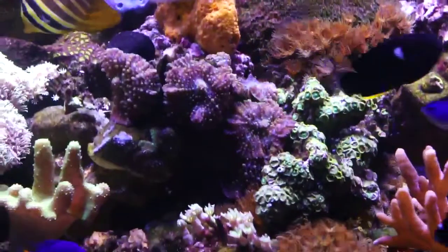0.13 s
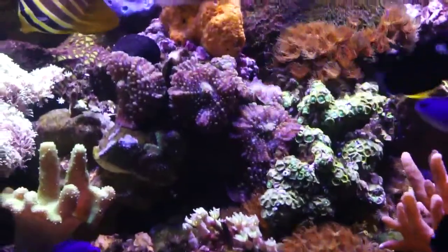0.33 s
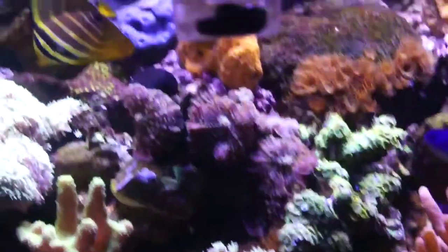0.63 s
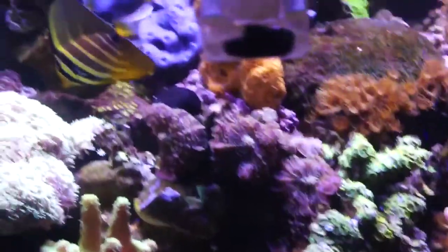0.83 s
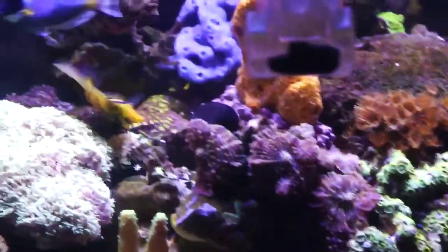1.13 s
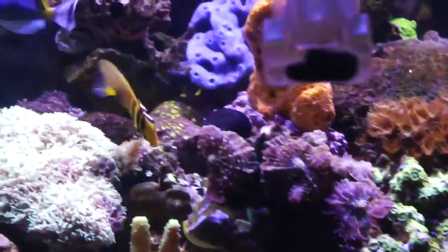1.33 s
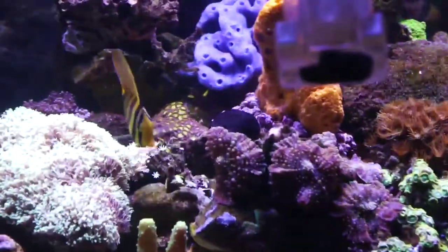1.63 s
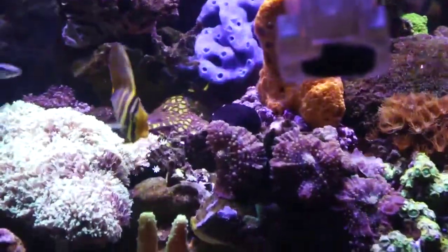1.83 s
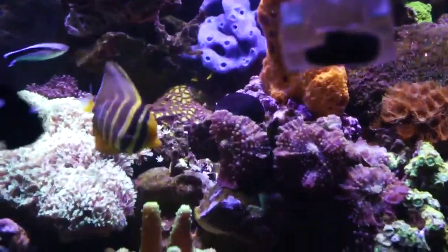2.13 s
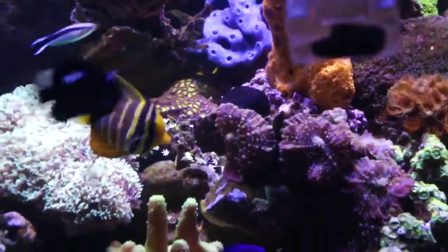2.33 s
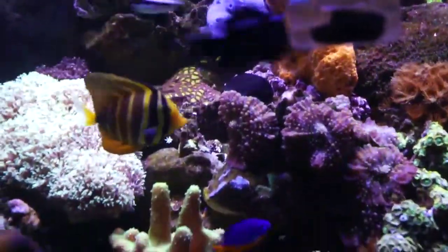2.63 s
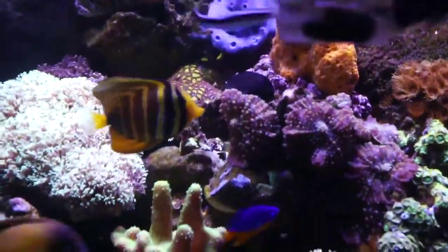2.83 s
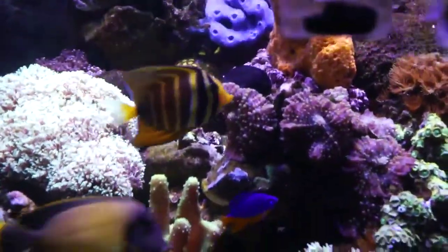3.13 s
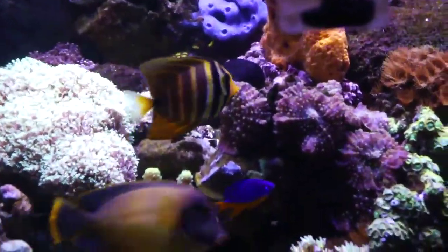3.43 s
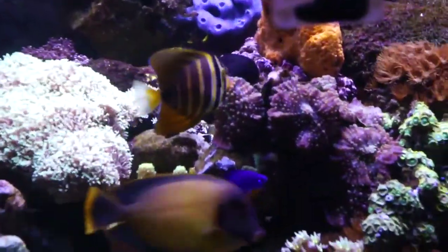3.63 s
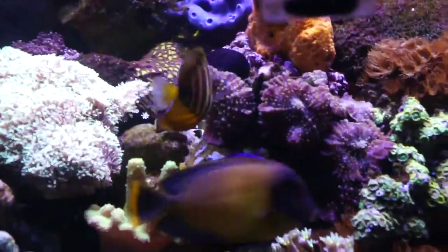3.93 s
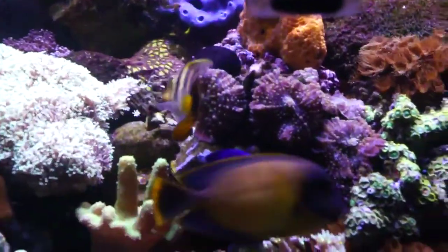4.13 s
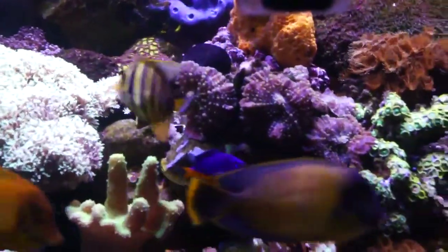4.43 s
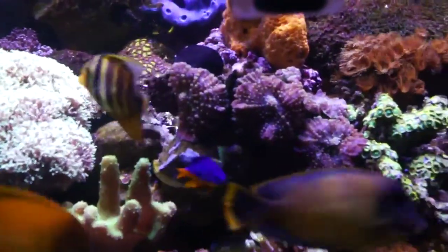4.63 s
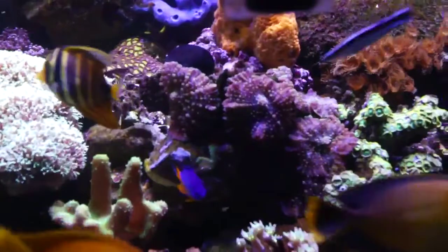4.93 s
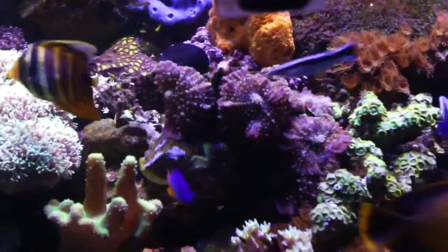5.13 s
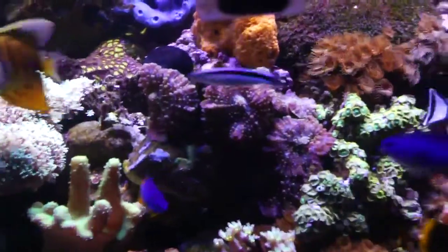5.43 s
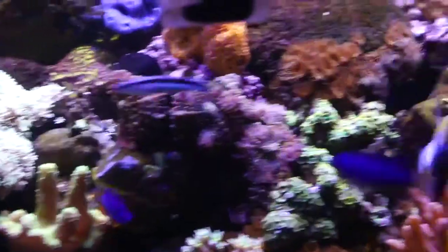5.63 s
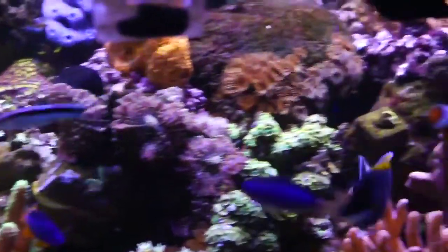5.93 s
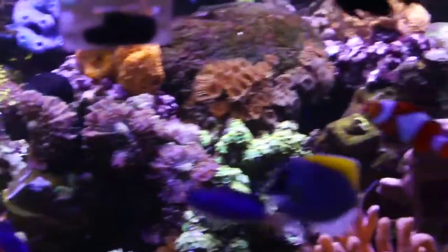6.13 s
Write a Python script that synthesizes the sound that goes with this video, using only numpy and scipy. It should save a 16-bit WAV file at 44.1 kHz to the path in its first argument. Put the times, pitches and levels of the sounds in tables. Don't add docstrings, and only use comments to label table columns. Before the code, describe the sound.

Aquarium pumps hum and water washes steadily in a small room, with faint knocks early on and one sharp plastic snap at four seconds.

```python
import sys
import numpy as np
from scipy import signal
from scipy.fft import rfft, irfft
from scipy.io import wavfile
from scipy.ndimage import uniform_filter1d

SR = 44100
rng = np.random.default_rng(int(sys.argv[2]) if len(sys.argv) > 2 else 0)


def amp(db):
    return 10 ** (np.asarray(db, float) / 20)


def write(x):
    x = np.atleast_2d(x).T
    wavfile.write(sys.argv[1], SR, np.round(np.clip(x, -1, 1) * 32767).astype(np.int16))


N = 277830
T = np.arange(N) / SR

MAINS_HZ = 49.9645
HUM_SPREAD = .39
# (multiple of mains [1], rms level [dB], left minus right [dB], left lead [rad])
HUM = [(1, -70.8, -0.6, 0.1), (2, -63.5, 0.8, 0.0), (3, -65.9, -1.6, -0.1), (4, -51.5, -3.1, 0.0),
       (6, -37.9, -2.1, -0.0), (7, -56.5, -4.1, -0.2), (8, -56.5, -0.3, -0.2), (10, -62.2, -8.5, 1.9),
       (11, -66.5, 5.2, 0.2), (13, -67.1, -1.2, 3.0), (14, -63.2, 2.2, -1.2), (15, -64.8, -7.0, 2.1),
       (17, -62.2, -7.8, -0.7), (18, -62.8, -3.6, -0.1)]
FAINT_MULTIPLES = [5, 16, 20, 22, 26, 30, 33, 46, 53, 54]
FAINT_DB, FAINT_DB_PER_OCTAVE, FAINT_PAN_DB, FAINT_PAN_SPREAD_DB = -69, -1.5, -4, 5
FAN_HZ, FAN_DB = 332, -61
# (frequency [Hz], density [dB per Hz], left minus right [dB], likeness of the ports [0-1])
WASH = [(30, -27, -14, .8), (70, -17.5, 4, 0.1), (122, -10.5, 4.5, 0), (217, -5.5, 5, 0.15),
        (368, 2, -2, 0.63), (448, -4, -2.5, 0.37), (925, -5.5, -1, 0.49), (1310, -7, -3, 0.28),
        (1930, -10, -0.5, 0.09), (2420, -9, -0.5, 0.16), (2930, -10.5, -2, 0), (3100, -13.5, 1, 0),
        (8700, -20, .5, 0.06), (12100, -28, -0.5, 0)]
WASH_DB = -44
# (frequency [Hz], width [Hz], rms level [dB], left minus right [dB])
WHIRR = [(275, 2.6, -62.5, -1), (374, 15, -60.5, -4), (493.7, 8.4, -63, 8), (660, 6.8, -72, 16),
         (1324, 31, -62.5, -7.5), (1489, 42, -65.5, 8.5), (2321, 40, -62.5, -2), (2790, 2.6, -65.5, -5.5),
         (6830, 90, -81, 4), (7920, 270, -70.5, -1)]

# (time [s], length [s], frequency [Hz], glide [Hz per s], wobble [Hz])
SQUEAKS = [
    (.04, .42, 8450, -950, 0),
    (.8, .32, 11600, 1000, 260),
]
SQUEAK_DB, SQUEAK_EDGE_S, WOBBLE_S = -74.5, .025, .175

# (frequency [Hz], level [dB], ring T60 [s])
STAND_MODES = [(140, -4, .07), (235, 0, .075)]
CLASP_MODES = [(2600, 0, .027), (3700, -9, .018), (4200, -10, .018)]
LID_MODES = [(651, -14, .05), (970, -9, .04), (1095, 0, .047), (1550, -10, .025), (2080, -9, .03)]
# (time [s], level [dB], hardness [dB per octave above 1 kHz])
STAND_BLOWS = [
    (1.108, -45, 0),
    (1.1525, -35, 0),
]
CLASP_BLOWS = [
    (1.151, -40, 3),
    (1.1579, -36, 1),
    (1.164, -48, 6),
]
LID_BLOWS = [
    (1.5814, -38, 12),
    (1.5869, -27.5, -8),
    (1.6025, -35.5, -4),
]
KNOCK_FLOOR_HZ, KNOCK_TO_ROOM_DB = 100, -11

ROOM_T60_S, ROOM_DB, ROOM_FILL_S = .27, -28.3, .003

# (frequency [Hz], density [dB per Hz])
CRACK_COLOUR = [(300, -54), (750, -24), (1000, -15), (1600, -17), (2400, -6.5), (3300, -13), (6000, -14),
                (9900, -15.5), (11800, -19), (13000, -20)]
RUSTLE_AT_S, RUSTLE_DB = 1.152, -47.5
CRACK_AT_S, CRACK_DB, CRACK_RISE_S = 3.990, -17.5, .0042

CHATTER_AT_S, CHATTER_GAP_S, LETS_GO_S, SLIP_S = 3.9888, .0018, 3.9972, .0012
CHATTER_DB, BUILD_DB_PER_S, FADE_DB_PER_S = -13, 1500, 2600
# (time [s], level [dB])
REBOUNDS = [
    (4.0056, -14),
    (4.0115, -14),
    (4.0155, -23),
    (4.0238, -21),
    (4.044, -22),
]
SNAP_PAN_DB, SWING_DB_PER_S, SWING_END_DB = -6, 550, 8
# (frequency [Hz], level [dB], left lead [rad])
PLASTIC_RING = [(970, -26, .5), (1090, -25, .5), (1300, -26, .5), (2205, -17, 1.6), (2440, -8, 2.0),
                (2580, -4.5, 2.3), (2855, -16, 2.0), (9745, -22.5, 1.0)]
RING_ON_DB, RING_ON_T60_S, RING_ROUGH_DB = -27, .36, 5
RING_TO_ROOM_DB = -12
TOP_HZ = 12200


def pan(db):
    return amp(np.array([db, -db]) / 2)


def unit(x):
    return x / np.sqrt(np.mean(x ** 2))


def walk(rate):
    k = int(SR / rate)
    held = np.repeat(rng.standard_normal(N // k + 1), k)
    return unit(uniform_filter1d(uniform_filter1d(held, k), k)[:N])


def two_noises(likeness):
    mid, side = rfft(rng.standard_normal((2, N)))
    c = np.clip(likeness, 0, 1)
    return np.sqrt(1 + c) * mid + np.sqrt(1 - c) * side * np.array([[1], [-1]])


def hum():
    turn = 2 * np.pi * MAINS_HZ * T + 0.0095 * walk(0.54)
    overtones = list(HUM)
    for k in FAINT_MULTIPLES:
        side_chance, lead_chance = rng.standard_normal(2)
        db = FAINT_DB + FAINT_DB_PER_OCTAVE * np.log2(k / FAINT_MULTIPLES[0])
        overtones.append((k, db, FAINT_PAN_DB + FAINT_PAN_SPREAD_DB * side_chance, 2 * lead_chance))
    out = 0
    for k, db, pan_db, lead in overtones:
        side = np.array([[lead], [-lead]]) / 2
        wave = np.cos(k * turn + HUM_SPREAD * k ** 2 + side)
        out = out + np.sqrt(2) * amp(db + 0.34 * walk(5.5)) * pan(pan_db)[:, None] * wave
    return out


def fan():
    phase = 2 * np.pi * np.cumsum(FAN_HZ + .5 * walk(1.98)) / SR
    return np.sqrt(2) * amp(FAN_DB + 2 * walk(3.24)) * pan(-1.5)[:, None] * np.sin(phase)


def wash():
    hz, db, pan_db, likeness = np.transpose(WASH)
    octaves = np.log2(np.maximum(np.fft.rfftfreq(N, 1 / SR), 1))

    def read(column):
        return np.interp(octaves, np.log2(hz), column)

    noise = two_noises(read(likeness)) * amp(read(db)) * pan(read(pan_db))
    out, together = 0, walk(1.9)
    for octave in range(4, 15):
        share = np.clip(1 - abs(octaves - octave), 0, 1)
        out = out + irfft(noise * share, N) * amp(0.04 * together + .5 * walk(9))
    return unit(out) * amp(WASH_DB)


def whirr():
    f, out = np.fft.rfftfreq(N, 1 / SR), 0
    for hz, width, db, pan_db in WHIRR:
        peak = 1 / (1 + (2 * (f - hz) / width) ** 2)
        likeness = 1 - hz / 3000
        out = out + unit(irfft(two_noises(likeness) * peak, N)) * amp(db) * pan(pan_db)[:, None]
    return out


def squeak():
    out = 0
    for s, length, hz, glide, wobble in SQUEAKS:
        age = T - s
        pitch = hz + glide * age + wobble * np.sin(2 * np.pi * age / WOBBLE_S) + 30 * walk(60)
        on = np.clip(np.minimum(age, length - age) / SQUEAK_EDGE_S, 0, 1) ** 2
        whistle = np.sin(2 * np.pi * np.cumsum(pitch) / SR)
        out = out + np.sqrt(2) * amp(SQUEAK_DB + 2.5 * walk(25)) * on * whistle
    return out


def knocks():
    out, t = np.zeros((2, N)), T[:8000]
    onset = 1 - np.exp(-t / .0015)
    for modes, blows in ((STAND_MODES, STAND_BLOWS), (CLASP_MODES, CLASP_BLOWS), (LID_MODES, LID_BLOWS)):
        for s, db, hard_db in blows:
            i = int(s * SR)
            for hz, mode_db, t60 in modes:
                spot = 1 + .003 * rng.standard_normal()
                ring = onset * np.exp(-np.log(1000) * t / t60) * np.sin(2 * np.pi * hz * spot * t)
                bright_db = hard_db * max(np.log2(hz / 1000), 0)
                out[:, i:i + len(t)] += ring * amp(db + mode_db + bright_db)
    return signal.sosfilt(signal.butter(2, KNOCK_FLOOR_HZ, "high", fs=SR, output="sos"), out)


def decay():
    t = T[:SR // 2]
    return amp(ROOM_DB) * (1 - np.exp(-t / ROOM_FILL_S)) * np.exp(-np.log(1000) * t / ROOM_T60_S)


def room(x):
    return signal.fftconvolve(x[1:], rng.standard_normal((2, SR // 2)) * decay())[:, :N]


def swell(start):
    age = np.clip((T - start) / CRACK_RISE_S, 0, 60)
    return (age / 2) ** 2 * np.exp(2 - age)


def causal(colour, size=1024):
    hz, db = np.transpose(colour)
    f = np.maximum(np.fft.rfftfreq(size, 1 / SR), 1)
    cepstrum = irfft(np.log(amp(np.interp(np.log(f), np.log(hz), np.maximum(db, -60)))))
    cepstrum[1:size // 2] *= 2
    cepstrum[size // 2 + 1:] = 0
    h = irfft(np.exp(rfft(cepstrum)))
    return h / np.sqrt(np.sum(h ** 2))


def rustle_and_crack():
    power = (amp(CRACK_DB) * swell(CRACK_AT_S)) ** 2 + (amp(RUSTLE_DB) * swell(RUSTLE_AT_S)) ** 2
    power = power + np.abs(signal.fftconvolve(power, decay() ** 2)[:N])
    opposed = rng.standard_normal(N) * np.array([[1], [-1]])
    noise = .4 * opposed + .9 * rng.standard_normal((2, N))
    return signal.fftconvolve(np.sqrt(power) * noise, causal(CRACK_COLOUR)[None])[:, :N]


def slips(count=8):
    times = CHATTER_AT_S + CHATTER_GAP_S * np.arange(count)
    fall_db = np.maximum(BUILD_DB_PER_S * (LETS_GO_S - times), FADE_DB_PER_S * (times - LETS_GO_S))
    events = list(zip(times, CHATTER_DB - fall_db)) + list(REBOUNDS)
    return [(s, db, min(SNAP_PAN_DB + SWING_DB_PER_S * max(s - LETS_GO_S, 0), SWING_END_DB))
            for s, db in events]


def snap_ring():
    push, t = np.zeros((2, N)), T[:600] / SLIP_S
    for s, db, pan_db in slips():
        i = int(s * SR)
        push[:, i:i + len(t)] += t * np.exp(1 - t) * amp(db) * pan(pan_db)[:, None]
    fade_db = 60 * abs(T - LETS_GO_S) / RING_ON_T60_S
    push += (T > LETS_GO_S) * amp(RING_ON_DB + RING_ROUGH_DB * walk(150) - fade_db)
    tones = 0
    for hz, db, lead in PLASTIC_RING:
        tones = tones + amp(db) * np.sin(2 * np.pi * hz * T + np.array([[lead], [0]]))
    return push * tones


def scene():
    tank = hum() + fan() + wash() + whirr()
    blows = knocks()
    ring = snap_ring()
    echoes = room(amp(RING_TO_ROOM_DB) * ring + amp(KNOCK_TO_ROOM_DB) * blows)
    return tank + squeak() + blows + rustle_and_crack() + ring + echoes


def band_limit(x):
    return signal.sosfilt(signal.butter(12, 12720, fs=SR, output="sos"), x)


def record(dry):
    dull = signal.sosfilt(signal.cheby1(10, .5, TOP_HZ, fs=SR, output="sos"), dry)
    return band_limit(dull)


dry = scene()
out = record(dry)
write(out)
```